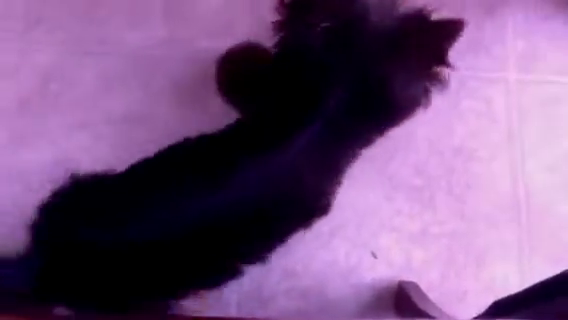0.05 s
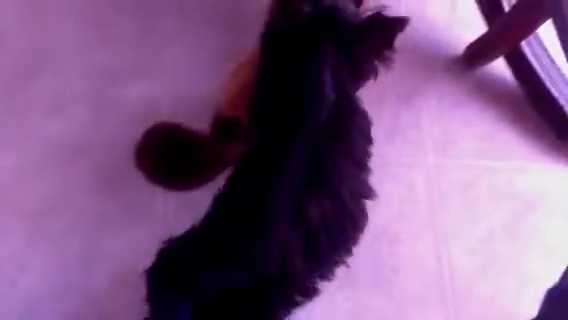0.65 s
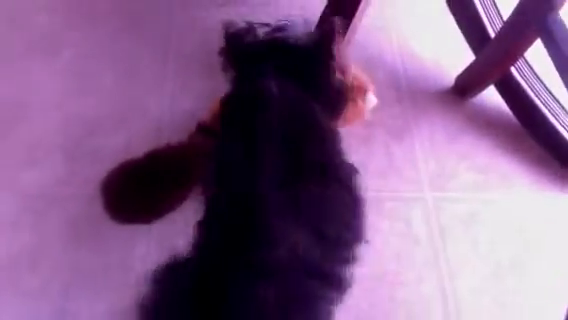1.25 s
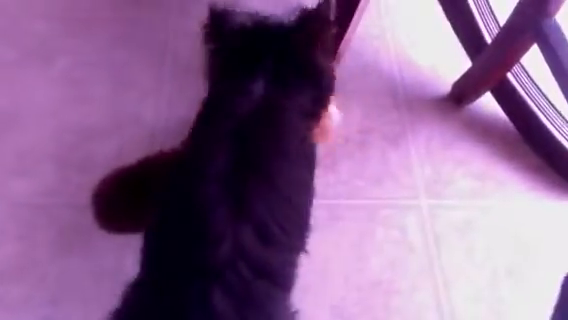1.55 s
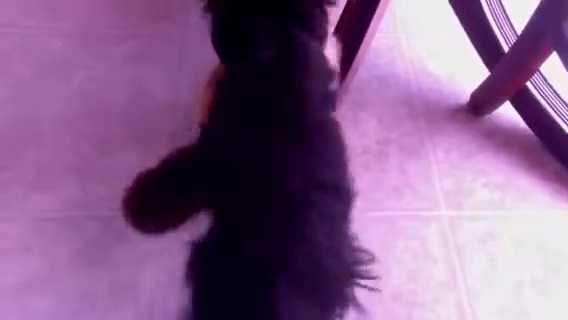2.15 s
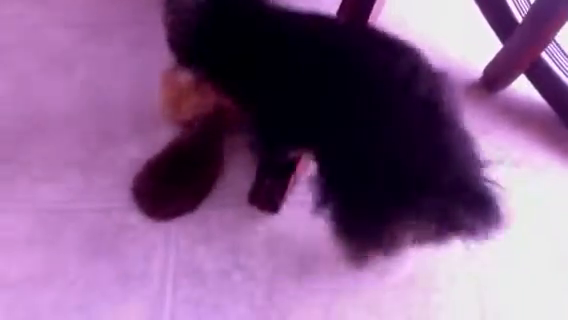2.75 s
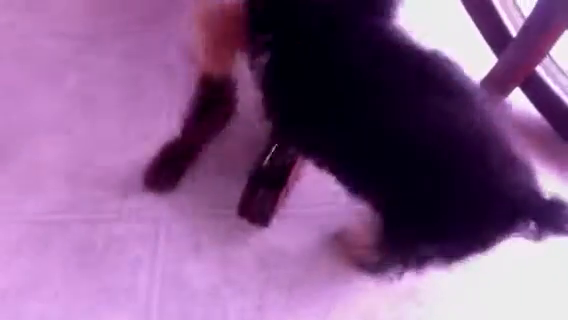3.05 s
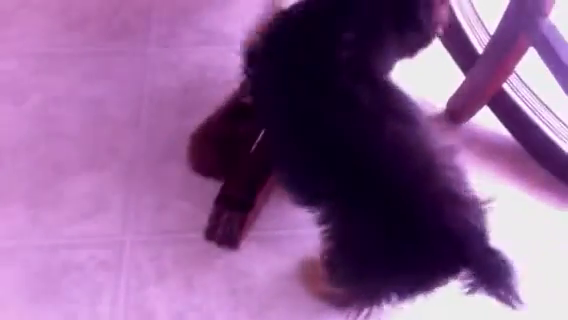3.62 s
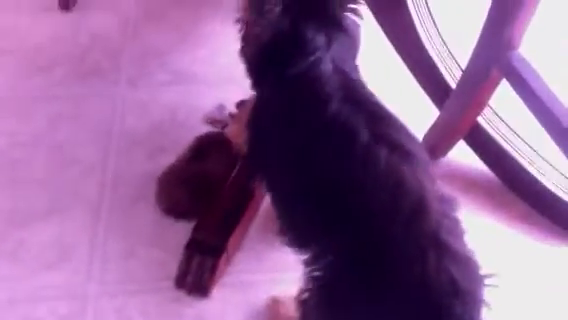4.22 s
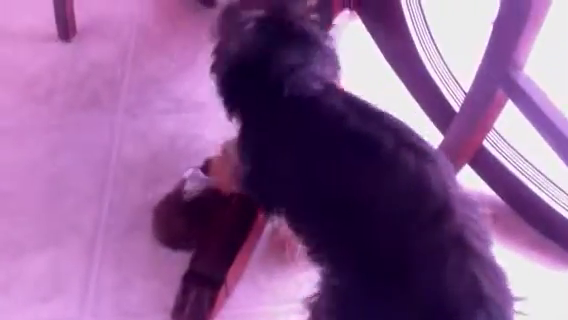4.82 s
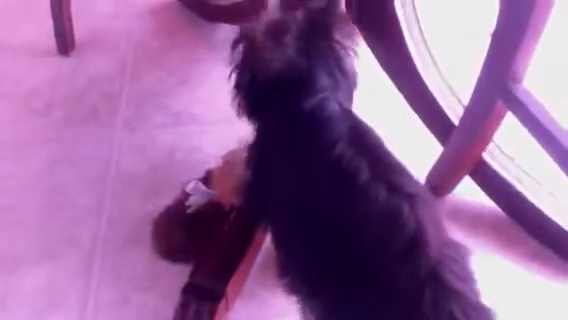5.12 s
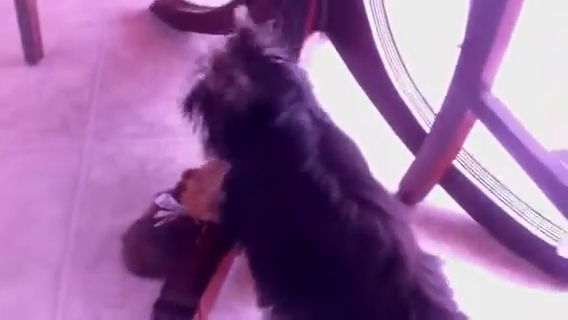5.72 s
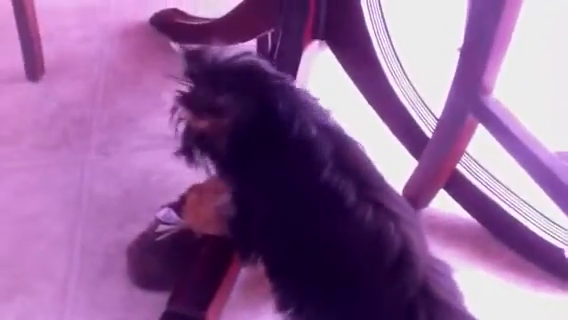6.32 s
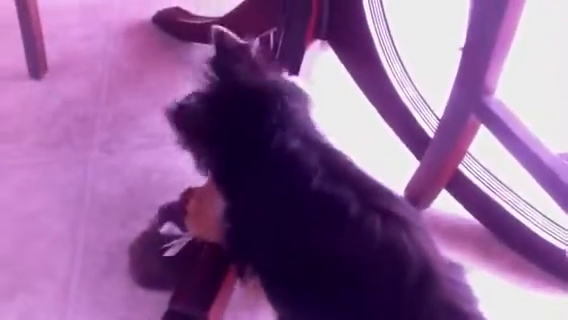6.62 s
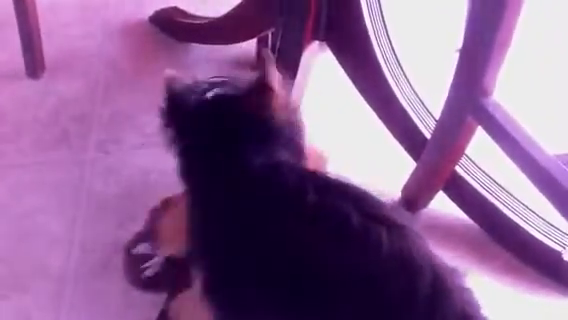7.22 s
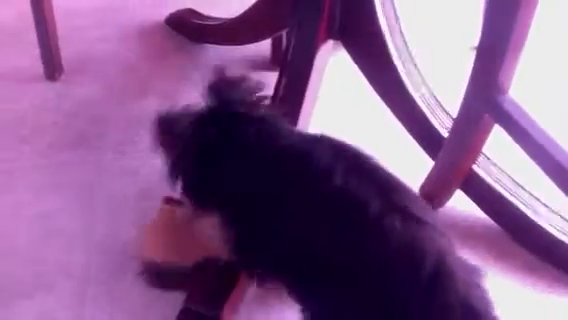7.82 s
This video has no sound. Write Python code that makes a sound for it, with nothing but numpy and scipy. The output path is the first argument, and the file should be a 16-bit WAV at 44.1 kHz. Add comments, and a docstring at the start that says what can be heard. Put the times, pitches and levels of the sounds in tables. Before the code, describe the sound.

A puppy chews a squeaky toy on a hard floor in a slightly echoing room. About six very short, high, reedy squeaks come unevenly in the first 2.5 seconds, with lower, hoarse notes as air draws back in and a sharp pop near 1.7 seconds. From about 2.2 seconds a hand bumps the microphone's case. Close, dry thumps, clicks, rubbing and scraping cluster from 2.8 to 3.6 seconds, much louder than the toy. The room sounds briefly muffled until about 4 seconds. After one squeak, more knocks come near 4.4 seconds, with a hissing rub that fades by about 5 seconds. Six more single squeaks follow between 5 and 7.7 seconds, roughly half a second apart, with another pop near 7.5 seconds. Faint chewing, fur rustle and a few soft paw bumps lie underneath, over low room noise and a slight hum.

```python
"""A plush squeaky toy squeaks as a puppy chews it on a hard floor in a lively room.
Each bite blows air past the toy's reed (a thin flap that buzzes), so the pitch rises and falls.
Air drawn back in sounds a lower note, and the toy's hollow bulb springs back with a pop.
Teeth and claws tick, paws pad and fur rustles. Midway, a hand rubs and knocks on the camera's case
and briefly covers the microphone. Low room noise and a faint hum lie underneath."""
import sys
import numpy as np
from scipy import signal
from scipy.fft import rfft, irfft
from scipy.io import wavfile

SR = 44100
rng = np.random.default_rng(int(sys.argv[2]) if len(sys.argv) > 2 else 0)


def store_pcm(level_fs):
    """Save levels as 16-bit WAV."""
    pcm = np.round(np.clip(level_fs, -1, 1) * 32767).astype(np.int16)
    wavfile.write(sys.argv[1], SR, np.atleast_2d(pcm).T)


N = 347067
TIME = np.arange(N) / SR
HIGHEST_HZ = 15500
PING_S = 0.0045

# tone colour of the toy's pops and rushing air: (frequency [Hz], level [dB])
PUFF_COLOUR = [(250, -12), (1200, -5.5), (1850, 2.5), (3000, -11.5), (6500, -11), (15000, -36.5)]
# tone colour of small hard clicks: (frequency [Hz], level [dB])
TICK_COLOUR = [(200, -32), (1300, 11.5), (3000, -4.5), (7000, -2.5), (15000, -30)]
# tone colour of skin hissing over the case: (frequency [Hz], level [dB])
SKIN_COLOUR = [(1000, -2.5), (3000, 0.5), (10000, -2.5), (13000, -8), (15500, -16.5)]


def squeaks(start_hz=1269, sag_share=0.042, ping_hz=2158, ping_db=15.5):
    """Each bite blows the reed, which pings as it starts and again as it stalls."""
    # bites: (time [s], length [s], level [dB], top pitch [Hz], top's place [share of length],
    # pitch lost in the stall [share], harmonics 2, 3, 4, 5 and all higher as the muzzle shades them
    # [dB, five columns], pitch the nozzle rings at [Hz])
    bites = [(0.227, 0.043, -18, 1329, 0.39, 0.15, 4.5, 4.4, 4, 7.5, 3.7, 10500),
             (1.003, 0.051, -23.5, 1419, 0.63, 0.24, -2, 2, 3.6, 10.5, 6, 12300),
             (1.398, 0.057, -30.5, 1314, 0.48, 0.16, -0.5, 3, 18.5, 24.5, 12, 12100),
             (1.793, 0.041, -24.5, 1309, 0.27, 0.28, -4.5, 2, 6.3, 7.5, 5.7, 11500),
             (1.837, 0.024, -26, 1316, 0.54, 0.25, 4.5, 5.1, 10, 11, 5, 10100),
             (2.4204, 0.053, -23.5, 1297, 0.34, 0.2, -2, 4.6, 11, 9, 7.9, 10760),
             (4.245, 0.052, -25, 1470, 0.7, 0.034, 6.5, 11, 6.7, 3, 5.9, 10400),
             (5.002, 0.049, -23.5, 1401, 0.38, 0.072, 7.5, 13.3, 6.9, 5, 5.7, 10240),
             (5.467, 0.046, -20.5, 1479, 0.49, 0.04, 7, 4.4, 4, 7.5, 8.7, 9170),
             (6.021, 0.046, -25.5, 1291, 0.48, 0.04, 2.5, 6.4, 4, -2.5, 8.4, 10030),
             (6.849, 0.059, -21.5, 1470, 0.54, 0.054, 6.5, 6.9, 7.3, 9, 6.4, 9450),
             (7.215, 0.057, -21.5, 1420, 0.5, 0.05, 6, 3.5, 16, 7, 9.6, 9450),
             (7.620, 0.06, -20, 1488, 0.42, 0.037, 7.5, 14.4, 12.2, -2, 4, 10070)]
    # strength of the harmonics when air blows out: (frequency [Hz], level [dB])
    blown = [(1000, -9.5), (1300, 6.5), (2150, 7), (2950, 4), (3300, -10), (6500, -22.5), (7800, -30),
             (9200, -19.5), (12600, -25.5), (14200, -56)]
    out = np.zeros(N)
    for s, length, db, top_hz, top_at, stall, *gains_db, nozzle_hz in bites:
        note = reed(length, start_hz, top_hz, top_at, sag_share, blown, gains_db, stall, nozzle_hz)
        add(out, s, amp(db) * note)
        for at in (s, s + length - PING_S):
            add(out, at, stall * amp(db + ping_db) * ping(ping_hz))
    return out


def reed(length, start_hz, top_hz, top_at, sag_share, spectrum, gains_db, stall, nozzle_hz=np.inf,
         scoop=0.27, rattle_db=-19, fall_power=1.82, air_db=-27, climb_db=4, sag_db=-3, hoarse=0.045):
    """The reed's pitch and level follow the air pressure: it builds, then sags as the jaw stops."""
    scoop_s, stall_s = 0.0012, 0.00549
    open_s, shut_s = 0.00065, 0.0027
    attack_s, release_s = 0.0024, 0.0023
    nozzle_peak_db, nozzle_width_hz = 9, 770
    t = np.arange(0, length, 1 / SR)
    progress, top_at = t / length, np.clip(top_at, .1, .9)
    climb = np.minimum(progress / top_at, 1)
    ease = np.maximum((progress - top_at) / (1 - top_at), 0)
    sag = ease ** fall_power
    pressure = climb - ease ** 1.9  # lingers at the top, then lets go faster and faster
    hz = start_hz + (top_hz - start_hz) * pressure - sag_share * start_hz * sag
    # the reed slides up to its note and drops as it stalls; it rasps then, and when blown too hard
    slack = scoop * np.exp(-t / scoop_s) + stall * np.exp((t - length) / stall_s)
    unrest = hoarse + 10 * (abs(hz / start_hz - 1) + slack)
    hz *= (1 - slack) * (1 + 0.01 * unrest * wander(len(t), 450))
    phase = 2 * np.pi * np.cumsum(hz) / SR
    # high harmonics (multiples of the pitch) are strong only while it swings far enough to slap shut
    slap = (1 - np.exp(-t / open_s)) * (1 - np.exp((t - length) / shut_s)) * (1 - sag ** 2)
    tone = np.zeros(len(t))
    for k in range(1, 16):
        flutter_db = 1.5 * np.sqrt(k * np.minimum(unrest, 2)) * wander(len(t), 82)
        if k == 1:
            weight = 1 - .5 * sag
        else:
            weight = amp(gains_db[min(k - 2, len(gains_db) - 1)]) * (slap if k > 2 else 1)
        nozzle_db = nozzle_peak_db * np.exp(-((k * hz - nozzle_hz) / nozzle_width_hz) ** 2)
        rattle = amp(rattle_db) * np.sqrt(k) * ease  # as the reed slackens, its tone turns to noise
        swing = np.sin(k * phase) + rattle * wander(len(t), 340) * np.cos(k * phase)
        swing /= np.hypot(1, rattle)
        gain = weight * amp(read(spectrum, k * hz) + flutter_db + nozzle_db)
        tone += gain * swing * (k * hz < HIGHEST_HZ)
    air = amp(air_db) * noise(PUFF_COLOUR, len(t))
    fades = np.minimum(t / attack_s, 1) * np.minimum((length - t) / release_s, 1)
    return unit((unit(tone) + air) * fades * amp(climb_db * climb + sag_db * sag))


def ping(hz):
    """The loose reed flips over and rings for a few cycles."""
    t = np.arange(0, PING_S, 1 / SR)
    return np.sin(np.pi * t / PING_S) ** 2 * np.sin(2 * np.pi * hz * t)


def refills(hold_share=0.28, sag_share=0.088):
    """The bulb sucks air back past the reed: a lower, hoarser note that holds, then droops."""
    # breaths in: (time [s], length [s], level [dB], pitch [Hz], boost of harmonics 3 and up [dB])
    breaths = [(1.347, 0.014, -28.5, 1000, 10), (1.674, 0.044, -23, 963, 8), (4.099, 0.031, -40, 990, 17),
               (7.081, 0.0518, -32.5, 998, 20.5), (7.454, 0.025, -30.5, 979, 8.5)]
    # strength of the harmonics when air is drawn in: (frequency [Hz], level [dB])
    drawn = [(950, 8.5), (1900, 12.5), (2900, -14), (5300, -8), (6800, -25), (8000, -8), (9800, -9),
             (13000, -33)]
    out = np.zeros(N)
    for s, length, db, hz, overtones_db in breaths:
        octave_db = db + 36  # louder notes have a stronger second harmonic
        note = reed(length, hz, hz, hold_share, sag_share, drawn, (octave_db, overtones_db),
                    stall=0, scoop=0, rattle_db=-6, fall_power=0.95, air_db=-21.5,
                    climb_db=-3.5, sag_db=-2.5, hoarse=0.2)
        add(out, s, amp(db) * note)
    return out


def pops(attack_s=0.0027, ping_hz=1720):
    """The bulb springs back into shape with a puff of noise and a ping of the reed."""
    # pops: (time [s], level [dB], time to fade by 60 dB [s], ping level [dB])
    springs = [(1.34, -24.5, 0.078, -33), (1.7194, -17.5, 0.06, -8.5), (4.158, -24, 0.044, -42.5),
               (7.471, -19.5, 0.062, -22)]
    out = np.zeros(N)
    for s, db, fade_s, ping_db in springs:
        puff = burst(PUFF_COLOUR, fade_s)
        add(out, s, amp(db) * puff * np.minimum(TIME[:len(puff)] / attack_s, 1))
        add(out, s, amp(ping_db) * ping(ping_hz))
    return out


def puppy(rustle_db=-64.5, chew_db=-43, chews_per_s=7, chew_hz=210):
    """Fur brushes the floor, the jaw chews unevenly, teeth and claws tick and paws pad."""
    # fur and plush on the floor: (time [s], length [s], peak [dB], peak's place [share of length])
    brushes = [(.55, 1.1, -67.5, 0.3)]
    # tone colour of fur: (frequency [Hz], level [dB])
    fur_colour = [(300, 0.5), (2200, -0.5), (4500, -6.5), (15000, -9)]
    # teeth and claws: (time [s], level [dB])
    ticks = [(.885, -39.5), (2.684, -31.5)]
    # paws and toy bumping the floor: (time [s], level [dB], pitch [Hz])
    bumps = [(0.739, -33.5, 139), (2.015, -35.5, 214), (5.171, -26, 174), (5.542, -36, 290),
             (6.216, -34, 610), (6.63, -38, 180)]
    fur = np.hypot(amp(rustle_db), strokes(brushes, swell_db=3.5))
    out = fur * amp(2 * wander(N, 25)) * noise(fur_colour)
    chews = (rng.random(N) < chews_per_s / SR) * rng.random(N)
    out += amp(chew_db) * signal.fftconvolve(chews, thump(chew_hz, cycles=6))[:N]
    for s, db in ticks:
        add(out, s, amp(db) * burst(TICK_COLOUR, fade_s=0.0029))
    for s, db, hz in bumps:
        add(out, s, amp(db) * thump(hz, cycles=6))
    return out


def hand_rubs(catch_db=-10):
    """Skin slides and catches on the case, making it rumble, scrape and hiss."""
    # the hand shifts its grip: (time [s], length [s], peak [dB], peak's place [share of length])
    grips = [(2.46, 0.94, -43.5, 0.035), (2.76, 0.13, -19.5, 0.64), (3.33, .17, -28.5, 0.31),
             (3.61, 0.095, -37, 0.51), (4.375, 0.18, -24.5, 0.25), (4.75, 0.31, -41.5, 0.72),
             (5.22, 0.14, -42.5, 0.51)]
    # a fingertip scrapes: (time [s], length [s], peak [dB], peak's place [share of length])
    scrapes = [(2.9, 0.38, -28.5, 0.54), (3.27, 0.186, -27, 0.37)]
    # tone colours of the rumble and the scrape: (frequency [Hz], level [dB])
    rumble_colour = [(110, -22.5), (170, 3), (400, 0.5), (700, -4.5), (1200, -7), (3000, -42.5)]
    scrape_colour = [(120, -7), (250, 10), (480, 6.5), (760, -7.5), (1900, 7.5), (2800, -4.5), (5000, -9.5),
                     (10000, -32)]
    grip, finger, palm = strokes(grips, swell_db=17), strokes(scrapes, swell_db=8), palm_slides()
    rumble = np.hypot(grip, palm)
    scrape = finger + amp(-6.5) * palm
    hiss = np.hypot(palm, amp(-12) * finger + amp(-22) * grip)
    out = rumble * friction(rumble_colour, per_s=250, spread_db=0, smooth=0.93)
    out += scrape * friction(scrape_colour, per_s=1100, spread_db=13.5, smooth=0.93) * amp(wander(N, 53))
    out += scrape * amp(catch_db) * friction(TICK_COLOUR, per_s=230, spread_db=-4.5, smooth=0)
    return out + hiss * friction(SKIN_COLOUR, per_s=1000, spread_db=0, smooth=1.9)


def palm_slides(attack_s=0.035, release_s=0.024, fade_db_per_s=29):
    """Loudness of the sliding palm: each slide starts fast and fades as the hand slows."""
    # slides over the case: (time [s], length [s], starting level [dB])
    slides = [(3.379, 0.099, -38), (3.445, 0.29, -52), (3.588, 0.21, -48), (4.379, 0.637, -33),
              (5.003, 0.42, -57)]
    level = np.zeros(N)
    for s, length, db in slides:
        t = np.arange(0, length, 1 / SR)
        contact = np.minimum(t / attack_s, 1) * np.minimum((length - t) / release_s, 1)
        add(level, s, amp(db - fade_db_per_s * t) * contact)
    return level


def hand_knocks():
    """The hand bumps the case, which thumps and clicks straight into the microphone."""
    # knocks: (time [s], thump level [dB], pitch [Hz], click level [dB])
    knocks = [(2.218, -16, 270, -77), (2.469, -7.5, 210, -46), (2.773, -11.5, 290, -40),
              (2.810, -4, 262, -31), (2.820, 1.5, 316, -31), (2.862, -5.5, 385, -2),
              (2.904, -14, 320, -15.5), (2.922, -18, 350, -24), (2.945, -16, 330, -18.5),
              (3.016, -14, 330, -26), (3.034, -18, 354, -16), (3.096, -9, 353, -14.5),
              (3.3507, -2.5, 1550, -18), (3.4194, 1, 1030, -46), (3.4613, 1, 336, -12),
              (3.6131, -12.5, 406, -25.5), (4.3747, 0, 427, -16.5), (4.445, -8.5, 310, -42),
              (4.488, -11, 1350, -16.5)]
    out = np.zeros(N)
    for s, db, hz, click_db in knocks:
        add(out, s, amp(db) * thump(hz, cycles=5.2))
        add(out, s, amp(click_db) * burst(TICK_COLOUR, fade_s=0.0058))
    return out


def finger_drag(half_width_hz=560, slips_per_s=53.5, slip_fade_db=7, hiss_db=-16):
    """A fingertip sticks and slips: pulsing, hissy noise that falls in pitch as it slows."""
    # course of the drag: (time [s], middle of the noise band [Hz], level [dB])
    course = [(3.307, 1900, -34.5), (3.349, 1650, -18.5), (3.383, 1349, -22.5), (3.423, 1000, -20)]
    s, hz, db = np.transpose(course)
    centre_tone = np.exp(2j * np.pi * np.cumsum(np.interp(TIME, s, hz)) / SR)
    band = (wander(N, half_width_hz) + 1j * wander(N, half_width_hz)) * centre_tone
    judder = unit(amp(-slip_fade_db * ((TIME - s[0]) * slips_per_s % 1)))
    chafe = judder * (unit(band.real) + amp(hiss_db) * noise(SKIN_COLOUR))
    return chafe * amp(np.interp(TIME, s, db)) * (TIME > s[0]) * (TIME < s[-1])


def palm_cover(x, from_s=3.5, to_s=4.09, cutoff_hz=3000):
    """The palm lies over the microphone for a moment and dulls the treble."""
    dull = signal.sosfilt(signal.butter(1, cutoff_hz, fs=SR, output="sos"), x)
    return np.where((TIME > from_s) & (TIME < to_s), dull, x)


def room(x, tail_db=-6, early_db=-7, echoes=16, turn_s=3.5, facing_db=-2):
    """Adds a few echoes off floor and furniture, then a smooth fading tail."""
    # how long the room rings: (frequency [Hz], time to fade by 60 dB [s])
    ring_times = [(2700, 0.56), (7000, 0.48), (13000, 0.37)]
    reflections = rng.standard_normal(SR) * np.minimum(TIME[:SR] / 0.039, 1)
    hz, t, bands = signal.stft(reflections, SR, nperseg=256)
    fade = amp(-60 * t / read(ring_times, hz)[:, None])
    tail = signal.istft(bands * fade, SR, nperseg=256)[1]
    response = amp(tail_db) * tail / np.linalg.norm(tail)
    delays = (rng.uniform(.008, .03, echoes) * SR).astype(int)
    response[delays] += amp(early_db) * rng.choice([-1, 1], echoes) / np.sqrt(echoes)
    # the room answers less until the puppy turns away under the chair
    into_room = x * amp(facing_db * (TIME < turn_s))
    return x + signal.fftconvolve(into_room, response)[:N]


def background(air_db=-54.5, hum_hz=127, hum_db=-64.5):
    """Low room noise with a faint hum."""
    # tone colour of the room noise: (frequency [Hz], level [dB])
    air_colour = [(30, 7), (110, 3.5), (400, -4.5), (900, -31), (1900, -17), (3000, -41), (15500, -64.5)]
    air = amp(air_db + wander(N, 23)) * noise(air_colour)
    return air + amp(hum_db) * unit(np.sin(2 * np.pi * hum_hz * TIME))


def strokes(rows, swell_db, contact_s=0.012):
    """Loudness of rubbing strokes: touch down, swell to a peak, fade and lift off."""
    level = np.zeros(N)
    for s, length, db, peak_at in rows:
        t = np.arange(0, length, 1 / SR)
        arch = np.interp(t / length, [0, np.clip(peak_at, .01, .99), 1], [-1, 0, -1])
        contact = np.minimum(np.minimum(t, length - t) / contact_s, 1)
        add(level, s, amp(db + swell_db * arch) * contact)
    return level


def friction(points, per_s, spread_db, smooth):
    """Rubbing noise: tiny random slips, mixed with a chosen amount of smooth sliding."""
    slips = (rng.random(N) < per_s / SR) * rng.choice([-1, 1], N)
    sizes = amp(spread_db * np.minimum(rng.exponential(1, N), 3))
    return colour(unit(slips * sizes) + smooth * rng.standard_normal(N), points)


def thump(hz, cycles, size=4096):
    """A struck thing rings briefly, fading by 60 dB in the given number of cycles."""
    turns = hz * np.arange(size) / SR
    return np.sin(2 * np.pi * turns) * np.exp(-np.log(1000) * turns / cycles)


def burst(points, fade_s, size=4096):
    """Noise that starts at once and fades by 60 dB in fade_s."""
    fade = 1e-3 ** (np.arange(size) / SR / fade_s)
    return unit(noise(points, size) * fade) * np.sqrt(np.mean(fade ** 2))


def wander(size, hz):
    """A smooth random wobble, with little in it faster than hz."""
    f = np.fft.rfftfreq(size, 1 / SR)
    return unit(irfft(rfft(rng.standard_normal(size)) / (1 + (f / hz) ** 4), size))


def noise(points, size=N):
    """Steady noise with the given tone colour."""
    return colour(rng.standard_normal(size), points)


def colour(x, points):
    """Shapes the lows and highs of x by a table, at average strength 1."""
    gains = amp(read(points, np.fft.rfftfreq(len(x), 1 / SR)))
    return unit(irfft(rfft(x) * gains, len(x)))


def read(points, hz):
    """Looks up a frequency in a table, gliding between rows on a log scale."""
    f, value = np.transpose(points)
    return np.interp(np.log(hz + 1), np.log(f + 1), value)


def add(mix, s, sound):
    """Mixes a sound in at s seconds."""
    part = mix[round(s * SR):][:len(sound)]
    part += sound[:len(part)]


def amp(db):
    """Turns decibels into a factor to multiply by."""
    return 10 ** (np.asarray(db) / 20)


def unit(x):
    """Scales x to an average strength (rms) of 1."""
    return x / np.sqrt(np.mean(x ** 2) + 1e-20)


def scene():
    """Toy and puppy echo in the room; the hand on the case has no echo."""
    toy = squeaks() + refills() + pops()
    through_air = palm_cover(room(toy + puppy()) + background())
    return (through_air + hand_rubs() + hand_knocks() + finger_drag())[None]


def record(dry, bass_hz=135, ceiling=0.72):
    """The small microphone drops the bass and softens the hardest knocks; the top treble is cut."""
    thin = signal.sosfilt(signal.butter(5, bass_hz, "high", fs=SR, output="sos"), dry)
    rounded = thin / (1 + (thin / ceiling) ** 4) ** .25
    treble_cut = signal.firwin(511, HIGHEST_HZ, window=("kaiser", 9), fs=SR)
    return signal.oaconvolve(rounded, treble_cut[None], "same")


dry = scene()
out = record(dry)
store_pcm(out)
```